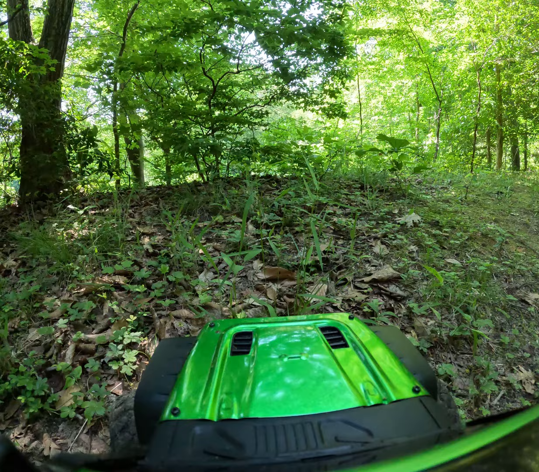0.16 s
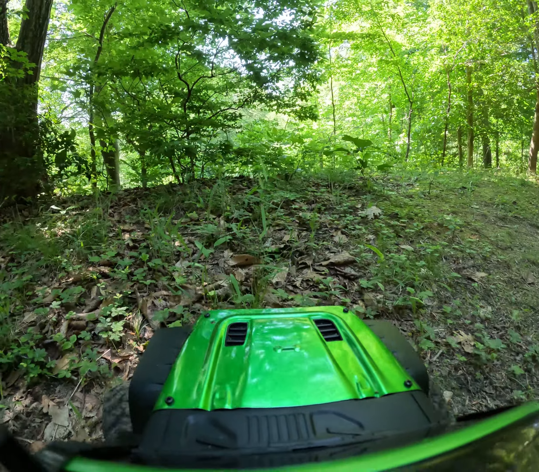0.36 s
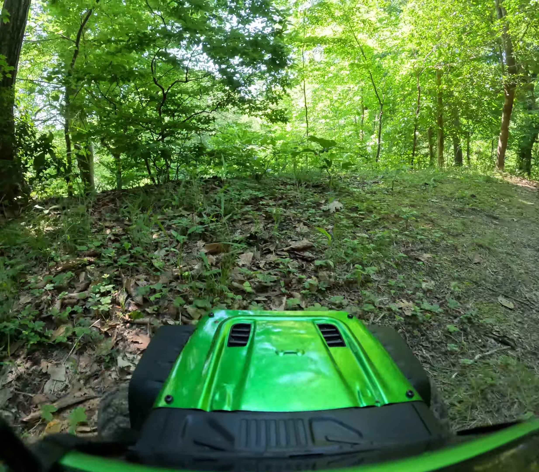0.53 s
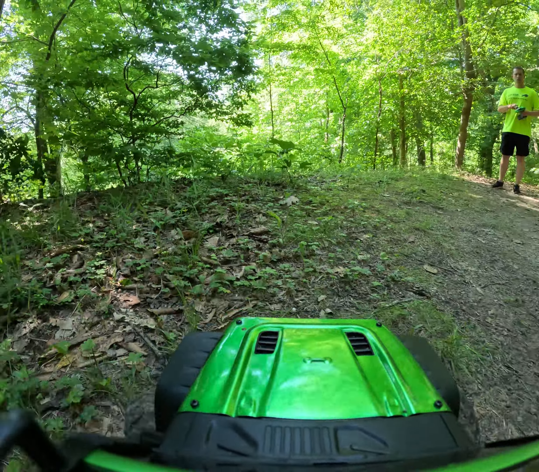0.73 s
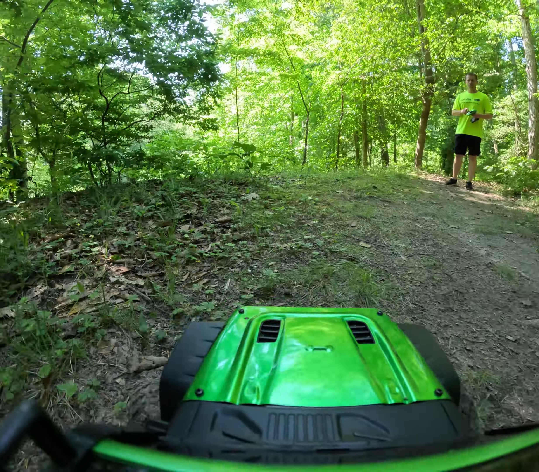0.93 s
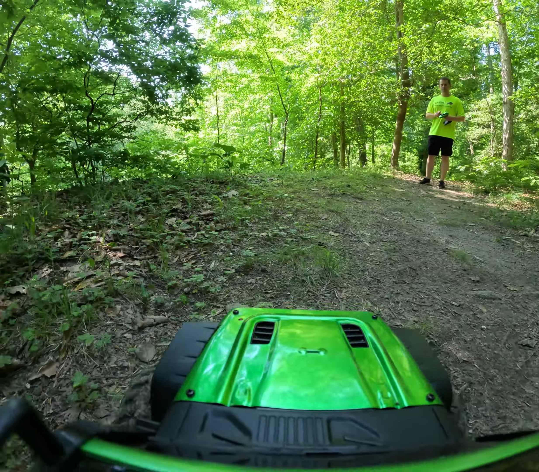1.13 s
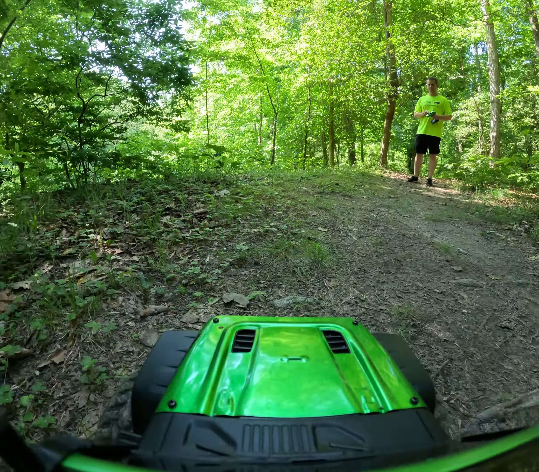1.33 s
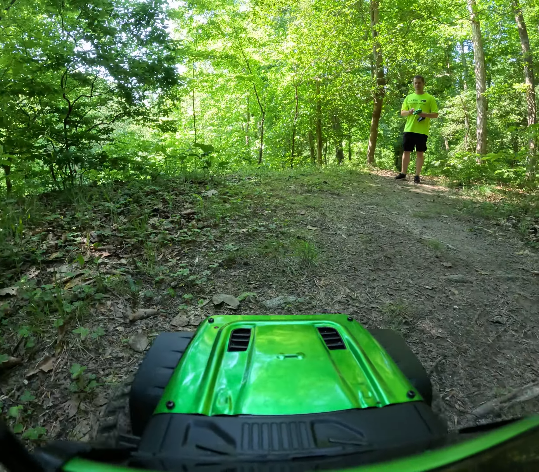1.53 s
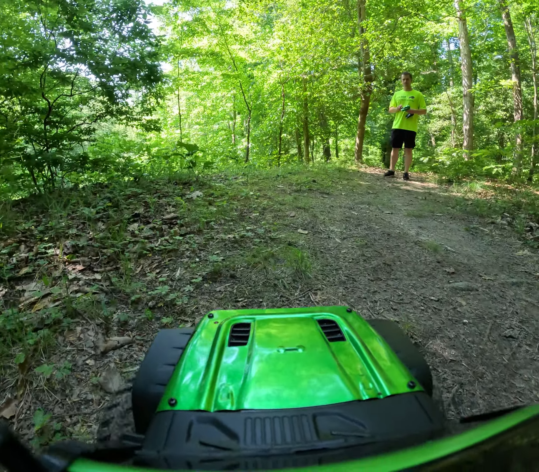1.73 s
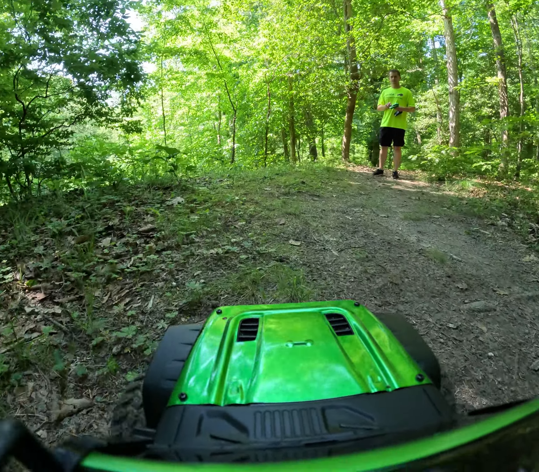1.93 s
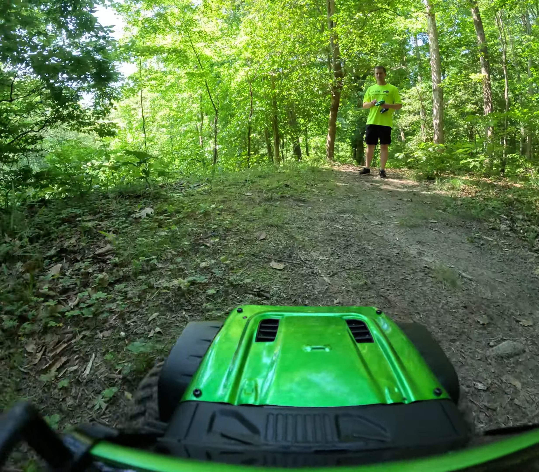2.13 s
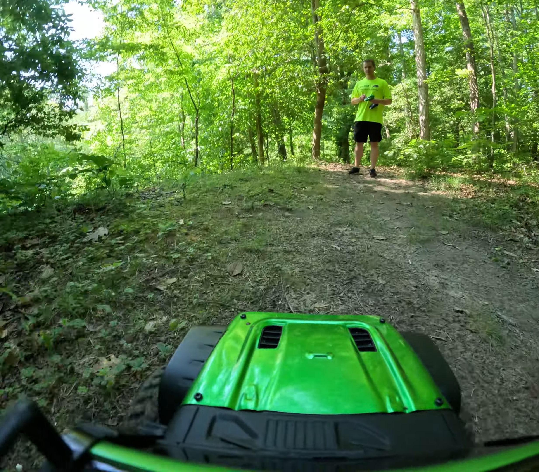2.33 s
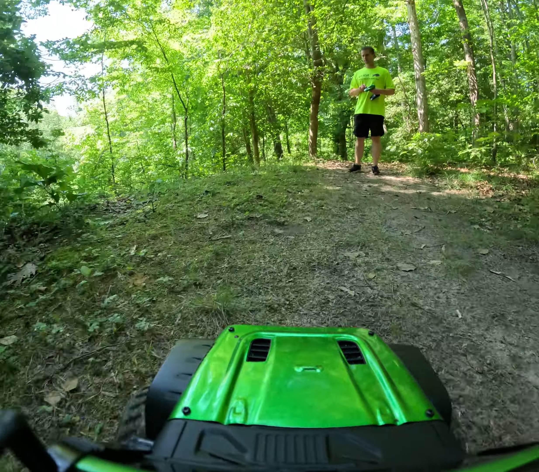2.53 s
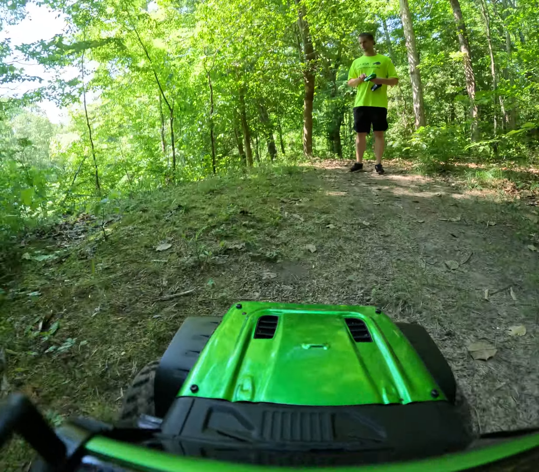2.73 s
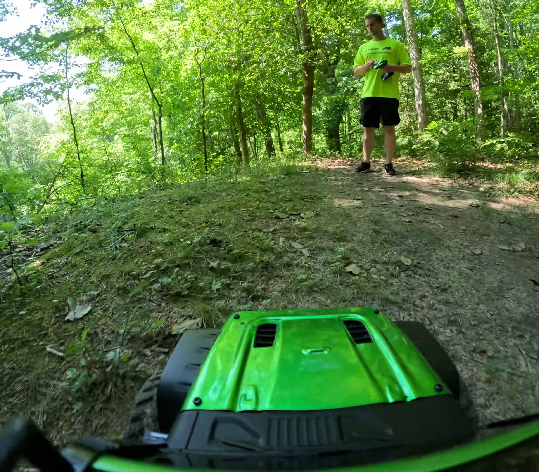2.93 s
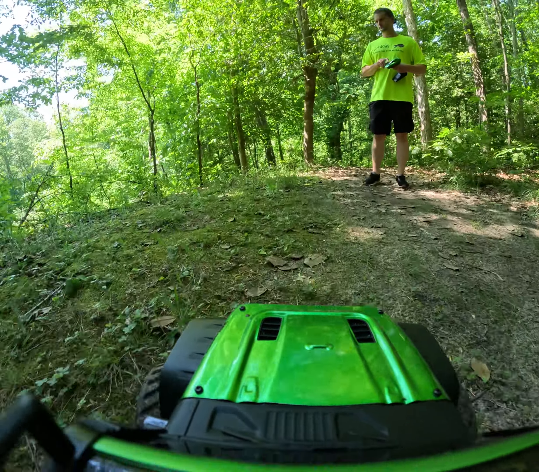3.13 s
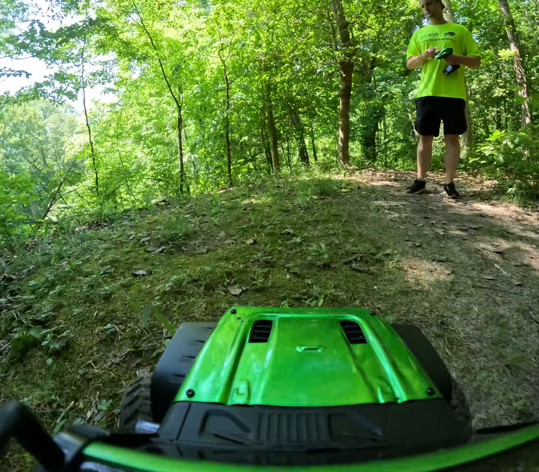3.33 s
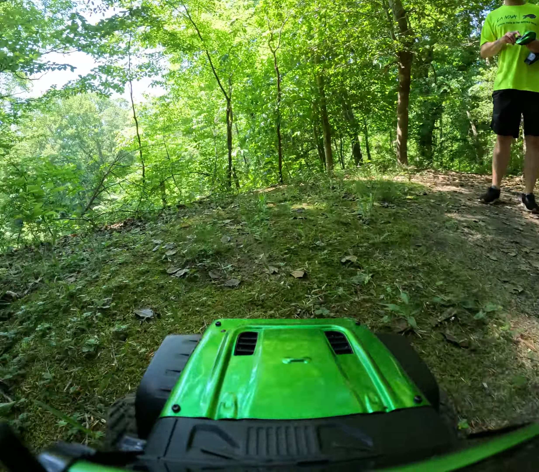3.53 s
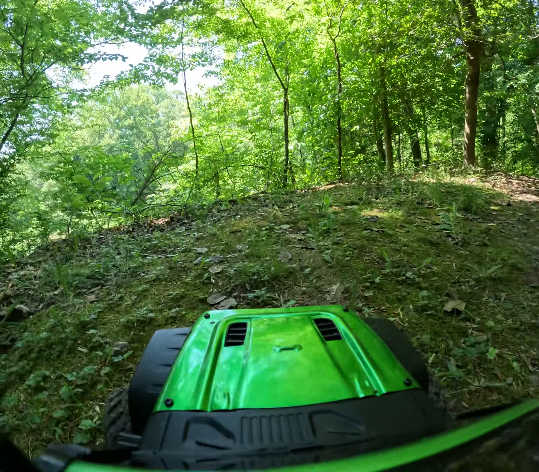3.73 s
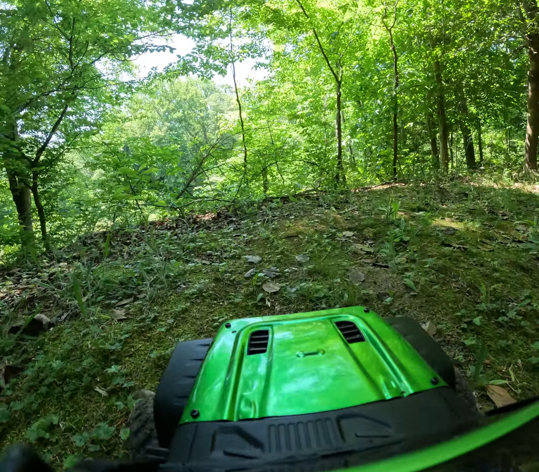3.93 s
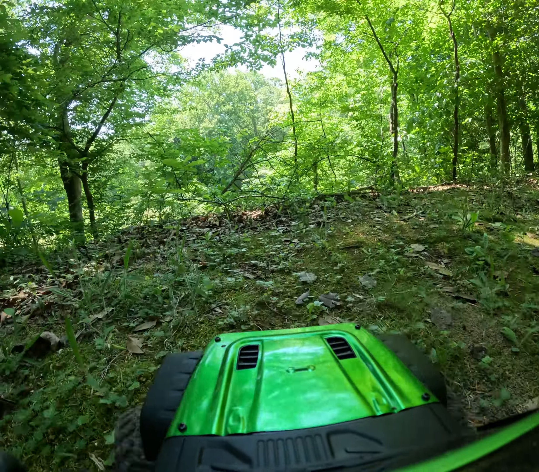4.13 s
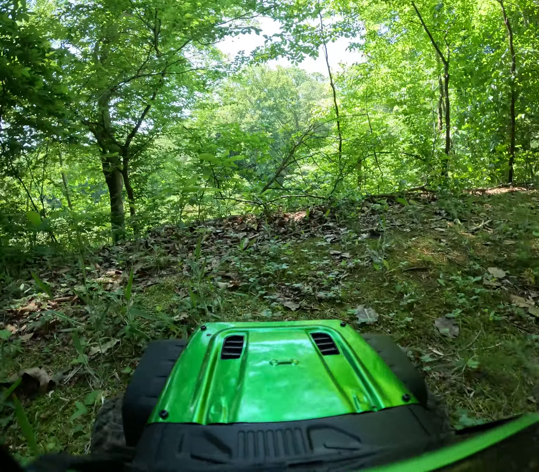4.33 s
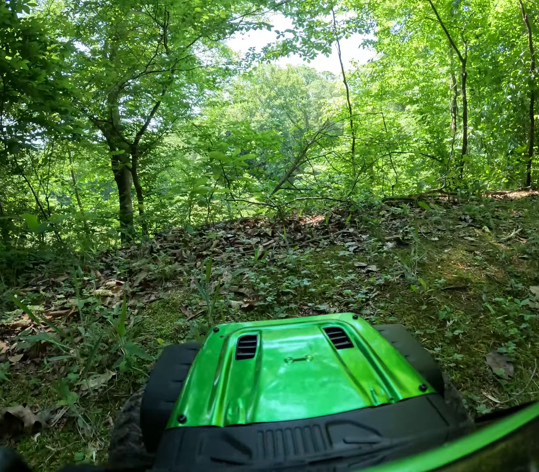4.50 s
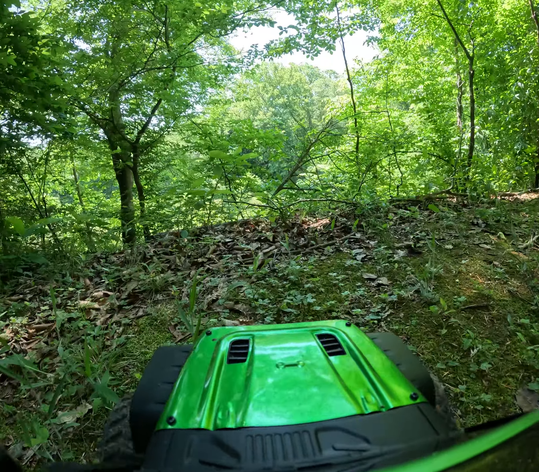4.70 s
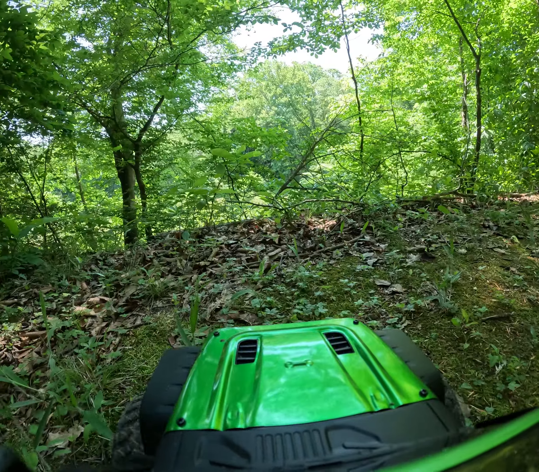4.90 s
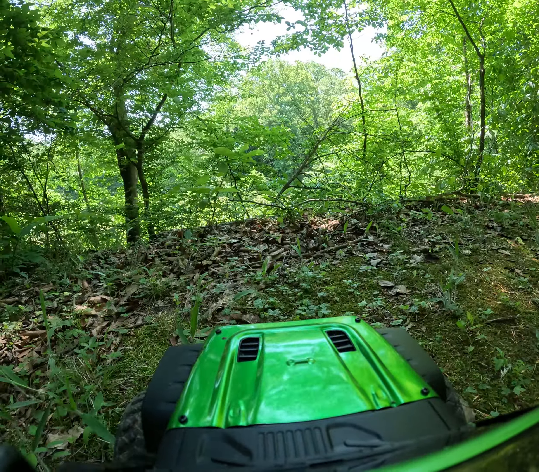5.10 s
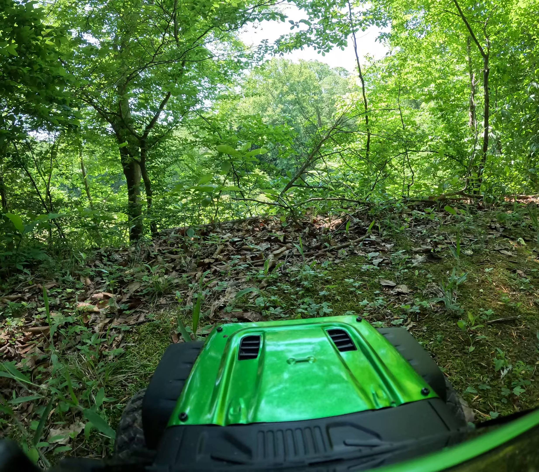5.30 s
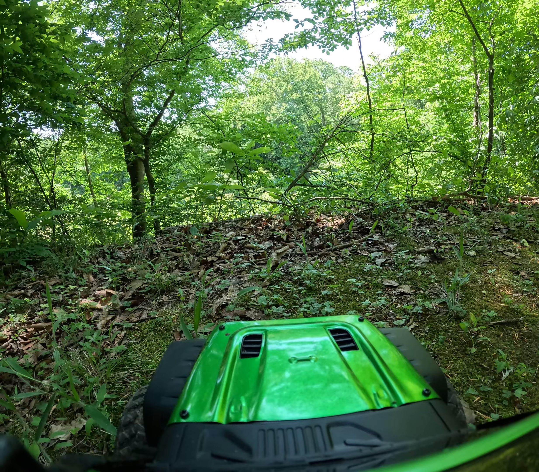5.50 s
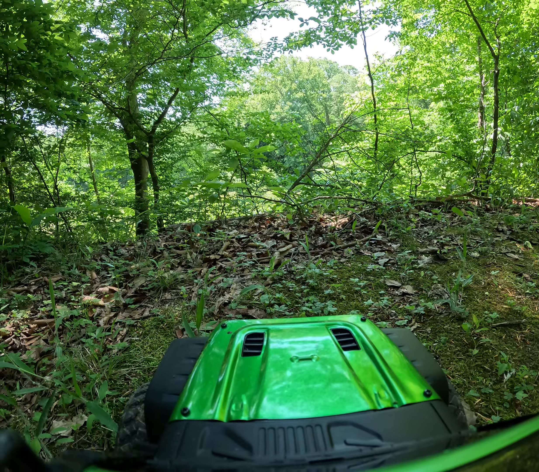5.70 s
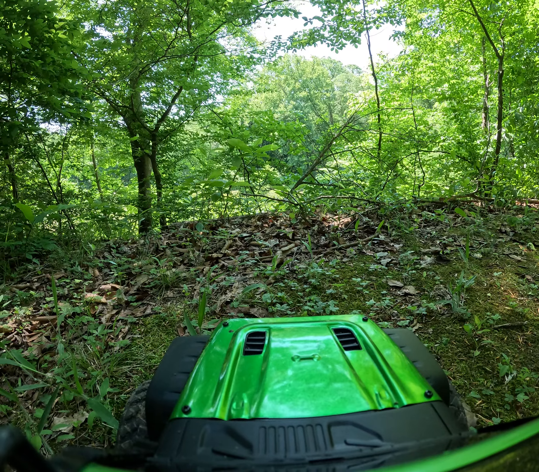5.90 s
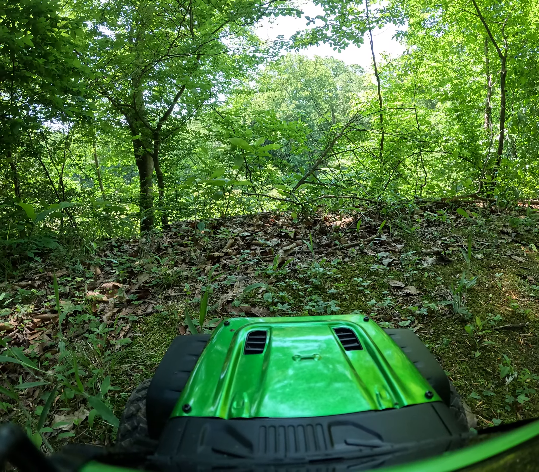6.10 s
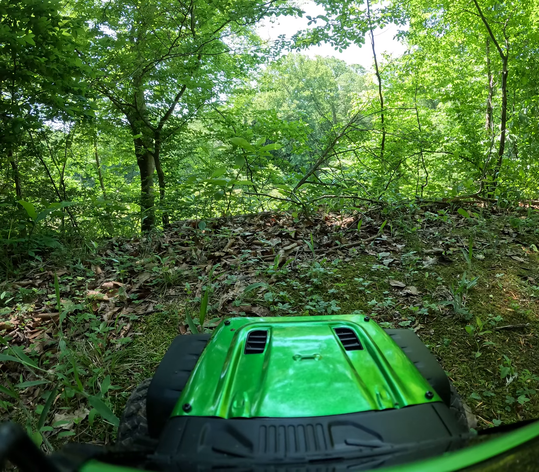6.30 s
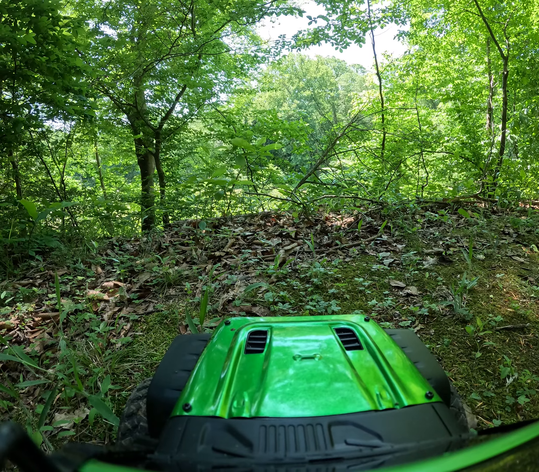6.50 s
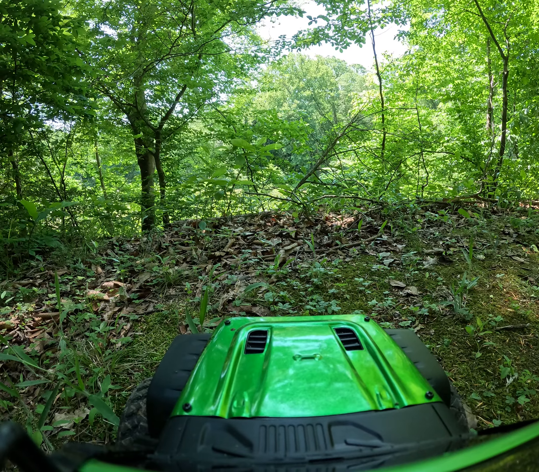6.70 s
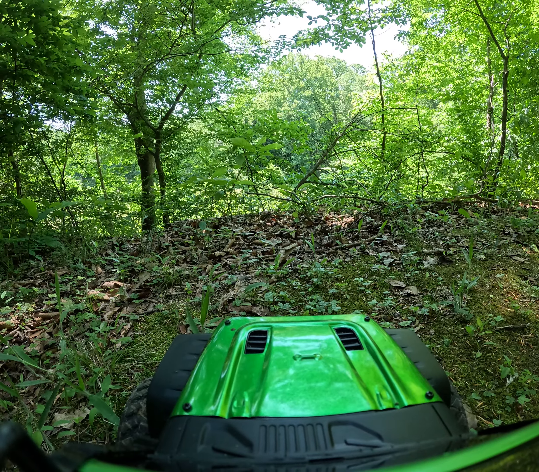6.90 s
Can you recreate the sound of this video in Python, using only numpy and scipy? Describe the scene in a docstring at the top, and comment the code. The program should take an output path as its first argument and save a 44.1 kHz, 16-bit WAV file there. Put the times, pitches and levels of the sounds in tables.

```python
"""The geared front and rear motors of a small electric model truck whine and rasp in surges, heard on board:
toothed harmonics follow two separate speed curves, and clashing teeth excite gearbox resonances.
Tyres crunch as filtered noise, the plastic body rattles as struck resonances, the suspension rocks and thuds.
The truck rolls to a halt and the steering servo twitches as coloured impacts; birds sing as gliding sines
with echoes off tree trunks, over soft filtered air and a far, throbbing harmonic hum."""
import sys
import numpy as np
from scipy import signal
from scipy.fft import rfft, irfft, next_fast_len
from scipy.io import wavfile
from scipy.ndimage import uniform_filter1d, map_coordinates

SR = 44100
rng = np.random.default_rng(int(sys.argv[2]) if len(sys.argv) > 2 else 0)


def wav_record(signal):
    """Record a signal, one row per channel, as 16-bit PCM in the file named by sys.argv[1]."""
    frames = np.transpose(np.atleast_2d(signal))
    bounded = np.clip(frames, -1, 1)
    # unit amplitude maps onto the largest positive 16-bit level
    quanta = np.round(bounded * 32767).astype(np.int16)
    wavfile.write(sys.argv[1], SR, quanta)


N = 306539
T = np.arange(N) / SR  # time [s]

# resonances of the gearbox: (frequency [Hz], width [Hz], relative level [dB])
GEARBOX = [(800, 41, 7), (956, 55, 5.5), (1214, 138, 8.5), (1780, 280, 0.5), (2093, 130, 4.5),
           (2830, 820, -5.5), (3550, 806, -7), (6180, 1600, -35)]
# how hard the ground shakes the moving truck: (time [s], chassis rattle [dB], suspension rocking [dB])
RIDE = [(.16, -55.5, -41.5), (.45, -40, -31), (.62, -38, -27), (.98, -36, -25), (1.12, -37, -27.5),
        (1.34, -48, -24.5), (1.46, -65.5, -35), (1.54, -77, -46), (1.66, -49.5, -33), (2.1, -37, -26.5),
        (2.48, -30.5, -19), (2.78, -29, -20), (3.24, -32.5, -23), (3.4, -33.5, -24.5), (3.8, -35, -24),
        (3.96, -38.5, -32), (4.15, -43.5, -31.5), (4.4, -35.5, -24), (4.68, -45.5, -37), (4.84, -53.5, -66),
        (5.1, -60.5, -59)]
# pulling away from rest: (start [s], end of motor note [s], note level [dB], clatter of gear slack [dB])
PULL_AWAYS = [(0.165, 0.565, -41, -35.5), (1.572, 2.06, -40.5, -30.5)]


def undb(db):
    """Level is logarithmic: decibels become an amplitude gain."""
    return 10 ** (np.asarray(db) / 20)


def unit(x):
    """Normalisation of the root-mean-square amplitude to 1."""
    return x / np.sqrt(np.mean(x ** 2))


def curve(rows, axis=1):
    """Linear interpolation in time of one column of a table."""
    rows = np.array(rows)
    return np.interp(T, rows[:, 0], rows[:, axis])


def walk(rate):
    """Low-frequency random modulation: held random values, smoothed into ramps, rms 1."""
    hold = max(int(SR / rate), 2)
    steps = np.repeat(rng.standard_normal(N // hold + 1), hold)
    return unit(uniform_filter1d(steps, hold)[:N])


def colour(x, points):
    """Minimum-phase filtering by a (frequency [Hz], gain [dB]) response, through the folded cepstrum."""
    hz, db = np.transpose(points)
    f = np.maximum(np.fft.rfftfreq(2 * N, 1 / SR), 1)
    log_gain = np.log(undb(np.interp(np.log(f), np.log(hz), db)))
    cepstrum = irfft(log_gain)
    size = next_fast_len(N + SR // 2)
    folded = np.r_[cepstrum[0], 2 * cepstrum[1:SR // 2]]
    response = np.exp(rfft(folded, size))
    return irfft(rfft(x, size) * response, size)[:N]


def ring(x, modes):
    """Modal superposition: resonances in parallel, neighbours in opposite phase."""
    total = np.zeros(N)
    for k, (hz, width, db) in enumerate(modes):
        b, a = signal.iirpeak(hz, hz / width, SR)
        total += (-1) ** k * undb(db) * signal.lfilter(b, a, x)
    return total


def flex(x):
    """Time-varying delay: the shell bends as it rides, so its resonances waver by a few percent."""
    delay_s = .0007 * walk(25)
    return map_coordinates(x, [(T + delay_s) * SR], mode="mirror")


def grains(rate, spread_db):
    """Shot noise: random impacts of either sign and uneven size, rms 1."""
    hit = rng.random(N) < rate / SR
    sign = rng.choice([-1, 1], N)
    size = undb(spread_db * np.clip(rng.standard_normal(N), -2, 2))
    return unit(hit * sign * size)


def bursts(rows):
    """Exponential decay after a linear rise: (time [s], rise [s], decay [s], level [dB])."""
    total = np.zeros(N)
    for s, rise, decay, db in rows:
        age = np.maximum(T - s, 0)
        total += undb(db) * np.minimum(age / rise, 1) * np.exp(-age / decay)
    return total


def held(start, end, attack_s, release_s):
    """Sustained envelope: a linear rise, a hold until the end and an exponential decay."""
    return np.clip((T - start) / attack_s, 0, 1) * np.exp(-np.maximum(T - end, 0) / release_s)


def swells(rows):
    """Sum of Gaussian pulses: (centre [s], height, half length [s])."""
    return sum(height * np.exp(-((T - s) / width_s) ** 2) for s, height, width_s in rows)


def woods():
    """Broadband turbulence gives soft air in the leaves; a harmonic series gives a far, throbbing hum."""
    # spectrum of the air: (frequency [Hz], relative level [dB])
    air_colour = [(12, -22.5), (20, -6.5), (49, -7.5), (84, -6), (135, -15), (169, -17), (263, -28),
                  (511, -43.5), (555, -48.5), (1080, -45.5), (1420, -42), (2040, -44), (3270, -48),
                  (4950, -53), (15000, -75.5)]
    # harmonics of the hum from the fundamental up: (relative level [dB])
    hum_partials = [0, -27, -25]
    # swells of the hum: (start [s], end [s], level [dB])
    hum_swells = [(1.253, 1.61, -44), (5.092, 5.503, -47), (5.835, 6.11, -44), (6.313, 6.636, -42.5),
                  (6.784, 6.953, -40.5)]
    air_db, hum_hz = -67.5, 78.2  # air level refers to its 300-2000 Hz band

    air = colour(rng.standard_normal(N), air_colour)
    middle = signal.sosfilt(signal.butter(4, [300, 2000], "band", fs=SR, output="sos"), air)
    breeze = undb(.8 * walk(5))
    phase = 2 * np.pi * np.cumsum(hum_hz * (1 + 0.0073 * walk(9.3))) / SR
    hum = unit(sum(undb(db) * np.sin((k + 1) * phase) for k, db in enumerate(hum_partials)))
    throb = sum(undb(db) * held(start, end, 0.11, 0.05) for start, end, db in hum_swells)
    return air / np.std(middle) * breeze * undb(air_db) + hum * throb


def birds(t60_s=1.05, echo_db=-4):
    """Frequency-modulated sines make fluted notes and slurs; multiple scattering by trunks adds echoes."""
    # notes: (start [s], length [s], start pitch [Hz], middle pitch [Hz], end pitch [Hz], relative level [dB])
    notes = [(1.26, 0.35, 6000, 6100, 6080, -80.5), (1.42, 0.11, 3650, 3720, 3620, -75),
             (1.535, 0.089, 3780, 4100, 4200, -73), (5.15, 0.15, 4800, 5060, 4850, -76.5),
             (5.163, 0.16, 5930, 6140, 6200, -80), (5.463, 0.089, 3010, 2955, 3040, -64.5),
             (5.543, 0.12, 2510, 2470, 2460, -61), (5.718, 0.24, 3470, 3540, 3470, -64.5),
             (5.727, 0.19, 4230, 4180, 4240, -83), (6.22, 0.069, 2800, 3020, 2280, -63.5),
             (6.377, 0.072, 2810, 3170, 2300, -62.5), (6.441, 0.14, 3860, 4390, 4350, -64),
             (6.55, 0.22, 4250, 4780, 4670, -73), (6.755, 0.06, 4370, 3830, 3830, -65),
             (6.798, .16, 3840, 3670, 3740, -68)]
    song, waver = np.zeros(N), walk(400)
    flutter = unit(undb(3 * walk(60)))
    for s, length, start_hz, middle_hz, end_hz, db in notes:
        on = (T >= s) & (T < s + length)
        u = (T[on] - s) / length
        hz = np.polyval(np.polyfit([0, .5, 1], [start_hz, middle_hz, end_hz], 2), u)
        # wide slurs quaver, level notes are nearly pure
        quaver = .003 + .2 * min(np.ptp(hz) / middle_hz, .2)
        hz = hz * (1 + quaver * waver[on])
        swell = np.sqrt(2 * np.abs(np.sin(np.pi * u)))
        song[on] += undb(db) * flutter[on] * swell * np.sin(2 * np.pi * np.cumsum(hz) / SR)
    # echoes gather as more and more trunks are reached, then fade
    lag = T[:SR]
    trunks = rng.standard_normal(SR) * np.minimum(lag / 0.069, 1) * np.exp(-np.log(1000) * lag / t60_s)
    echoes = signal.fftconvolve(song, trunks / np.linalg.norm(trunks))[:N]
    return song + undb(echo_db) * echoes


def steering():
    """Impact excitation: small servo gears rasp in jerks, and ring the servo case through longer turns."""
    # steering twitches: (time [s], rise [s], decay [s], level [dB])
    twitch_rows = [(5.93, 0.0071, 0.05, -51.5), (5.99, 0.0033, 0.011, -56), (6.045, .005, 0.028, -59.5),
                   (6.603, 0.005, 0.058, -52.5), (6.7, 0.011, 0.043, -62)]
    # spectrum of a twitch: (frequency [Hz], relative level [dB])
    twitch_colour = [(200, 0.5), (500, 5.5), (800, -5.5), (1250, 3), (1700, -0.5), (2200, 0.5), (4000, -7),
                     (8000, -23), (14000, -44)]
    # longer turns: (start [s], end [s], level [dB])
    turns = [(1.08, 1.17, -40), (4.865, 4.958, -51.5), (4.95, 5.02, -58.5)]
    # resonances of the servo case: (frequency [Hz], width [Hz], relative level [dB])
    case = [(1250, 235, 4), (1660, 500, -5.5), (2070, 200, -4.5), (2900, 1100, -15)]
    twitches = unit(colour(grains(rate=4300, spread_db=2.0), twitch_colour)) * bursts(twitch_rows)
    turning = sum(undb(db) * held(start, end, 0.021, .02) for start, end, db in turns)
    whir = unit(ring(grains(rate=1800, spread_db=2.0), case)) * turning
    return twitches + whir


def suspension():
    """Forced vibration of a sprung body shakes the microphone; bottoming out excites a dull resonance."""
    # spectrum of the rocking: (frequency [Hz], relative level [dB])
    rock_colour = [(8, -19.5), (20, 1.5), (28, 1.5), (38, -6), (50, -13.5), (62, -12.5), (85, -19),
                   (120, -24), (170, -40), (260, -36.5), (600, -91.5)]
    # thuds on bottoming out: (time [s], rise [s], decay [s], level [dB])
    thuds = [(.885, 0.0074, 0.042, -30), (1.01, 0.007, 0.028, -29.5)]
    # resonance of a thud: (frequency [Hz], width [Hz], relative level [dB])
    thud_mode = [(128, 80, 0)]
    sway = unit(colour(rng.standard_normal(N), rock_colour))
    strength = np.sqrt(uniform_filter1d(sway ** 2, SR // 10))
    # dividing by the running strength lets the ride alone set the level
    rocking = sway / strength * undb(curve(RIDE, axis=2))
    thud = unit(ring(ring(rng.standard_normal(N), thud_mode), thud_mode))
    return rocking + thud * bursts(thuds)


def chassis(shaking):
    """Modal excitation: tread blocks and loose parts patter on the body, and larger bumps knock it."""
    # resonances of the body: (frequency [Hz], width [Hz], relative level [dB])
    body = [(145, 143, -1.5), (265.6, 57, 5), (376.5, 109, 2.5), (545.5, 95, 4.5), (797.5, 59, 4),
            (1004, 72, -8.5), (1190, 96, -5), (1680, 510, -14), (1950, 410, -14.5), (3500, 190, -29)]
    # bumps: (time [s], relative strength [dB], treble share [dB], decay [s])
    knocks = [(.605, -35, -18, .008), (.67, -30, -16, .008), (.785, -23, -12, .012),
              (.886, -26.5, -22, 0.011), (0.91, -23, 1, 0.012), (0.98, -24.5, -20, .007),
              (1.008, -25, -10, 0.0093), (1.029, -25, -24, 0.0067), (1.107, -34, -14, .005),
              (1.18, -27, -14, .007), (1.291, -27, -13, 0.0085), (2.155, -27, -12, 0.0069),
              (2.186, -20, -4, 0.0074), (2.352, -20, -17, .007), (2.468, -13.5, -1, 0.0084),
              (2.494, -15.5, -13, 0.012), (2.541, -13, -12, 0.0044), (2.585, -14.5, -14, 0.011),
              (2.67, -20, -14, 0.018), (2.714, -18, -14, .008), (2.736, -20, -16, .005),
              (2.783, -14.5, -4, 0.0065), (2.833, -15.5, -6, 0.0066), (2.925, -22, -18, 0.0075),
              (2.984, -16.5, -22, 0.0074), (3.109, -19, -14, 0.0037), (3.16, -20, -18, 0.0066),
              (3.205, -15, 0, 0.0054), (3.248, -18, -18, .006), (3.275, -17, -14, 0.0039),
              (3.402, -19.5, -14, 0.0058), (3.457, -19.5, -8, .005), (3.531, -25.5, 7, 0.0074),
              (3.66, -21, -13, 0.007), (3.766, -18, -4.5, 0.0074), (3.81, -20.5, -24, 0.0064),
              (3.987, -26, -8, 0.0061), (4.067, -25.5, -1, 0.0058), (4.378, -20, -20, .007),
              (4.397, -25.5, -19, 0.015), (4.514, -35, 10.5, 0.014), (4.559, -24.5, -18, 0.0032),
              (4.678, -18.5, -9, 0.0036), (4.767, -36.5, 1, 0.0061)]
    # the tyres cushion the treble: (frequency [Hz], gain [dB])
    cushion = [(3000, 0.5), (7000, -2), (14000, -17.5)]
    taps = grains(rate=1800, spread_db=4) * undb(1.3 * walk(40)) + .7 * grains(rate=90, spread_db=3)
    patter = unit(ring(taps, body)) * shaking * undb(-1.5)
    blows, cracks = np.zeros(N), np.zeros(N)
    age = np.arange(SR // 20) / SR
    for s, db, treble_db, decay_s in knocks:
        i = int(s * SR)
        envelope = np.minimum(age / .0015, 1) * np.exp(-age / decay_s)
        contact = rng.standard_normal(len(age)) * envelope * undb(db)
        blows[i:i + len(age)] += contact
        cracks[i:i + len(age)] += contact * undb(treble_db)
    rattle = flex(patter + undb(10.5) * ring(blows, body))
    return colour(rattle + undb(3.0) * ring(cracks, GEARBOX), cushion)


def tyres():
    """Granular friction: grit, grass and dry leaves crackle under the tread as noise and impacts."""
    # spectrum of the crunch: (frequency [Hz], relative level [dB])
    crunch_colour = [(600, -15), (2000, 16), (4200, 8.5), (5200, 3.5), (6200, 3.5), (7000, -2.5), (8200, 0),
                     (9500, -5.5), (13200, -11.5), (14200, -16), (16000, -28)]
    crackle = unit(rng.standard_normal(N) + .4 * grains(rate=300, spread_db=6)) * undb(1.5 * walk(60))
    return unit(colour(crackle, crunch_colour))


def ground():
    """Displacement excitation: ruts and hops change the ride; returns the rattle and tread crunch gains."""
    # a wheel drops into a rut and the rattle swells: (time [s], level rise [dB])
    ruts = [(0.206, 16.5), (.41, 4), (.545, 4.5), (.8, 5.5), (1.11, 1), (1.3, 4), (1.617, 18.5), (3.18, 2),
            (4.66, 6), (4.77, 2)]
    # the wheels hop clear and the rattle lets up: (time [s], level drop [dB])
    hops = [(.865, 3), (.96, 2.5), (1.072, 7), (2.06, 9), (2.889, 3.5), (3.325, 2.5), (3.943, 4.5),
            (4.595, 3.5), (4.83, 5.5)]
    jolt_s = 0.025  # half length of a rut or hop
    jolts = swells([(s, db, jolt_s) for s, db in ruts] + [(s, -db, jolt_s) for s, db in hops])
    shaking = undb(curve(RIDE) + jolts)
    # only part of a jolt reaches the crunch, set 18 dB below the ride's rattle level
    tread = undb(curve(RIDE) + 0.384 * jolts - 18)
    return shaking, tread


def throttle():
    """Load dependence: each push sets the strength of whine, rasp, flying grit and the whine's edge."""
    # pushes: (start [s], end [s], whine at start [dB], whine at end [dB],
    #          then relative to the whine: gear rasp [dB], flying grit [dB], bright edge [dB])
    pushes = [(0.156, 0.42, -44, -33, -13.5, -22.5, -33), (0.442, 0.521, -28, -41.5, -4, -12, -13),
              (0.513, 0.601, -35.5, -29, -18, -11.5, -21), (0.604, 0.848, -34, -27.5, -14, -10.5, -6),
              (1.65, 2.077, -43, -34.5, -3, -11.5, -5), (2.09, 2.312, -30, -29.5, -7.5, -11, -7),
              (2.321, 2.364, -25, -24.5, -16, -16, -10), (2.375, 2.555, -31.5, -33, -3, -10, -12),
              (2.552, 2.644, -27.5, -26.5, -23, -17, -26), (2.657, 2.85, -31.5, -33.5, -19, -12.5, 0.5),
              (3.352, 3.662, -34, -31.5, -3.5, -15.5, -14), (4, 4.051, -29, -34.5, 0.5, -17.5, -24),
              (4.058, 4.205, -41.5, -36, 1.5, -11, -23), (4.202, 4.302, -30, -32.5, -3, -17.5, -35),
              (4.37, 4.484, -34.5, -38, -17, -13.5, -29)]
    load, clash, grit, bite = np.zeros((4, N))
    for start, end, start_db, end_db, rasp_db, grit_db, edge_db in pushes:
        slope = undb(np.interp(T, [start, end], [start_db, end_db]))
        push = held(start, end, attack_s=0.023, release_s=0.014) * slope
        load += push
        clash += push * undb(rasp_db)
        grit += push * undb(grit_db)
        bite += push * undb(edge_db)
    return load, clash, grit, bite


def motor_start():
    """Electromagnetic excitation: at a crawl, current pulses make the windings sing near one fixed note."""
    start_hz = 989
    phase = 2 * np.pi * np.cumsum(start_hz * (1 + 0.00834 * walk(120))) / SR
    tone = np.sin(phase) + undb(-18) * np.sin(2 * phase) + undb(-19.5) * np.sin(3 * phase)
    crawling = sum(undb(db) * held(start, end, 0.0087, 0.3) for start, end, db, _ in PULL_AWAYS)
    return unit(tone * (1 + 0.53 * walk(150))) * crawling


def front_speed():
    """Tooth rate [Hz] is the front motor's mesh frequency; biting tyres drag it down and let go."""
    # speed on the first and the second run: (time [s], tooth rate before bites [Hz])
    first_run = [(.17, 1150), (.205, 1200), (.235, 960), (.28, 800), (.34, 760), (.39, 660), (.46, 760),
                 (.52, 820), (.55, 1070), (.66, 1060), (.71, 1000), (.735, 1160), (.81, 1150), (.86, 1000),
                 (.925, 550)]
    second_run = [(1.6, 460), (1.78, 700), (1.86, 620), (1.915, 770), (1.98, 800), (2.02, 990),
                  (2.08, 1100), (2.115, 1430), (2.24, 1290), (2.3, 1350), (2.35, 1950), (2.47, 2000),
                  (2.6, 2150), (2.68, 2100), (2.72, 2350), (2.8, 2500), (2.85, 2000), (2.91, 1190),
                  (3.32, 1150), (3.4, 1900), (3.43, 1650), (3.46, 1860), (3.485, 1120), (3.57, 1230),
                  (3.63, 1800), (3.69, 1220), (3.98, 1040), (4.17, 960), (4.24, 1070), (4.29, 1060),
                  (4.33, 620), (4.37, 600), (4.47, 910), (4.6, 500)]
    # a front tyre bites: (time [s], share of the speed lost, half length [s])
    bites = [(.298, .28, .014), (.425, .24, .02), (.502, .26, .016), (.608, .44, .026), (.688, .14, .02),
             (.768, .14, .022), (1.875, .17, .015), (1.952, .22, .018), (2.06, .48, .02),
             (2.178, .41, .033), (2.287, .36, .027), (2.397, .37, .017), (2.505, .38, .014),
             (2.63, .12, .02), (4.07, .22, .016), (4.198, .2, .014)]
    return curve(first_run + second_run) * (1 - swells(bites))


def rear_speed():
    """Independent mesh frequency [Hz]: the rear motor slips and grips at other moments."""
    # speed of the rear motor: (time [s], tooth rate [Hz])
    rear_run = [(.17, 560), (.27, 700), (.33, 600), (.39, 670), (.43, 600), (.465, 1090), (.56, 1090),
                (.6, 800), (.68, 1170), (.72, 1060), (.85, 1050), (.925, 600), (1.6, 420), (1.92, 720),
                (2.02, 1020), (2.08, 1100), (2.18, 1640), (2.2, 1630), (2.27, 2100), (2.32, 1580),
                (2.36, 2080), (2.4, 1850), (2.48, 2400), (2.52, 2000), (2.57, 2350), (2.6, 1980),
                (2.7, 2120), (2.74, 1640), (2.83, 2130), (2.91, 1300), (3.33, 1200), (3.37, 1650),
                (3.4, 1900), (3.425, 1280), (3.45, 1760), (3.495, 2130), (3.52, 2130), (3.565, 1180),
                (3.6, 1660), (3.63, 1720), (3.72, 1150), (4.025, 1050), (4.055, 660), (4.21, 1030),
                (4.26, 1130), (4.37, 600), (4.47, 900), (4.6, 480)]
    return curve(rear_run)


def tooth_turns(steady_hz):
    """Phase integrates tooth rate: inertia rounds it, and ground jerks grow with speed."""
    inertia_s, jitter = .014, .016
    hz = uniform_filter1d(steady_hz, int(inertia_s * SR))
    judder = hz / 1000 * (walk(400) + .5 * walk(80))
    return 2 * np.pi * np.cumsum(hz * (1 + jitter * judder)) / SR


def gear_rasp(tooth_phase):
    """Impulsive excitation: irregular tooth clashes, gathered once a tooth, ring the plastic gearbox."""
    clashes = grains(rate=7000, spread_db=2.5) * (1 + np.cos(tooth_phase)) * undb(1.4 * walk(70))
    return unit(flex(ring(clashes, GEARBOX)))


def gear_whine(tooth_phase, shaking):
    """Periodic tooth contact makes a harmonic series, modulated by pinion runout and rough ground."""
    # spectrum of the whine: (frequency [Hz], gain [dB])
    whine_colour = [(300, -12), (600, 0), (1050, 1.5), (1300, 1), (1600, -2), (1850, -1.5), (2130, 3),
                    (2450, -6), (2800, -4.5), (3350, -3.5), (4200, -9), (5000, -14), (8000, -26)]
    hoarse_db = -31  # chassis rattle at which the whine is fully hoarse
    # the off-centre pinion of 12 teeth shakes the whine once a turn
    shake = 1 + .3 * np.sin(tooth_phase / 12)
    rough = .62 * (1 + np.minimum(shaking / undb(hoarse_db), 1) ** 2) / 2
    tone = np.zeros(N)
    for k in range(1, 7):
        # the higher the partial, the hoarser
        phase = k * tooth_phase + .2 * k * rough * walk(500)
        tone += (1 + rough * walk(350)) * np.sin(phase) / k
    mesh_flicker = undb(2.6 * np.clip(walk(45), -2, 1.3))
    return unit(colour(tone * shake * mesh_flicker, whine_colour))


def scene():
    """Superposition: throttle and rough ground drive the truck until it halts; the wood carries on."""
    # twigs and stones flick the gearbox: (time [s], rise [s], decay [s], level [dB])
    scrape_rows = [(1.24, 0.01, 0.0095, -26), (2.28, 0.0033, 0.0036, -19), (3.202, 0.0037, 0.0042, -28)]
    steady_hz = front_speed()
    front, rear = tooth_turns(steady_hz), tooth_turns(rear_speed())
    load, clash, grit, bite = throttle()
    shaking, tread = ground()
    scrapes = bursts(scrape_rows)
    # the gears' slack clatters 12 ms after each pull-away: rise 11 ms, decay 15 ms
    slack = bursts([(s + 0.012, 0.011, 0.015, db) for s, _, _, db in PULL_AWAYS])

    whine = unit(gear_whine(front, shaking) + undb(-3.5) * gear_whine(rear, shaking))
    # loaded teeth meet harder and the whine gains an edge
    edge = signal.sosfiltfilt(signal.butter(2, 2800, "high", fs=SR, output="sos"), whine)
    whine = whine * np.hypot(load, shaking * undb(-17)) + edge * bite

    rasp = gear_rasp(front) * (np.hypot(clash, shaking * undb(-1.5)) + slack + scrapes)

    # faster wheels throw up more grit: 6 dB per octave of tooth rate about 970 Hz
    wheelspin = undb(6 * np.log2(steady_hz / 970))
    crunch = tyres() * (np.hypot(grit * wheelspin, tread) + slack * undb(-17) + scrapes * undb(-25))

    truck = whine + rasp + crunch + motor_start() + chassis(shaking) + suspension()
    rolling = np.interp(T, [.155, .175, 5.03, 5.12], [0, 1, 1, 0])
    return (truck * rolling + steering() + birds() + woods())[None]


def record(dry):
    """Band limitation: the microphone dips shallowly near 14.3 kHz and cuts steeply above 15.4 kHz."""
    dulled = colour(dry[0], [(13300, 0.0), (14300, -4), (15500, -0.5)])
    return signal.sosfilt(signal.ellip(10, .2, 80, 15400, fs=SR, output="sos"), dulled)[None]


dry = scene()
out = record(dry)
wav_record(out)
```